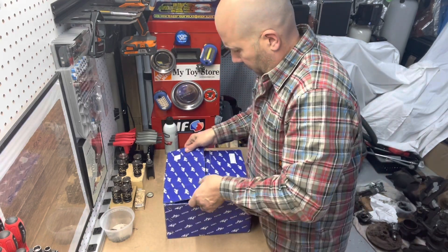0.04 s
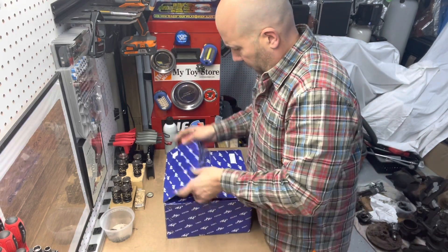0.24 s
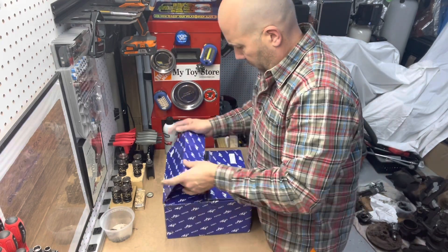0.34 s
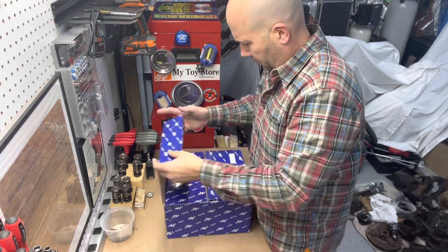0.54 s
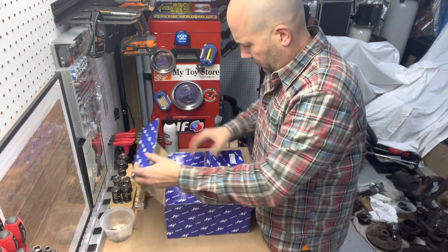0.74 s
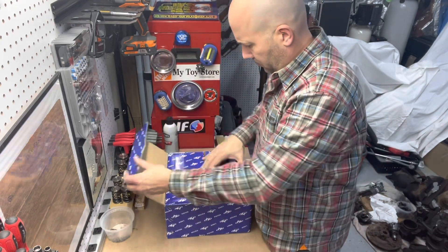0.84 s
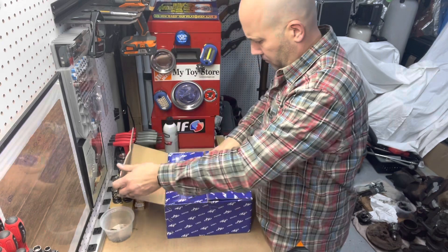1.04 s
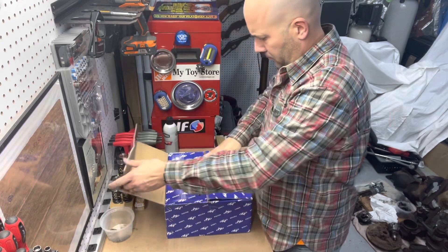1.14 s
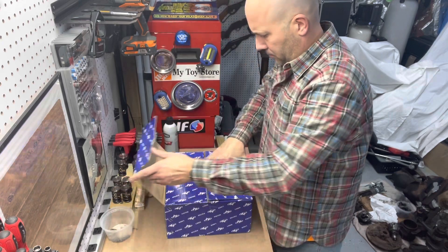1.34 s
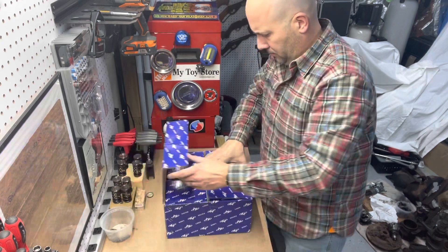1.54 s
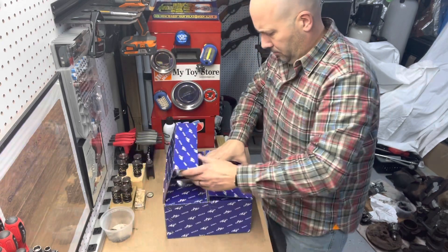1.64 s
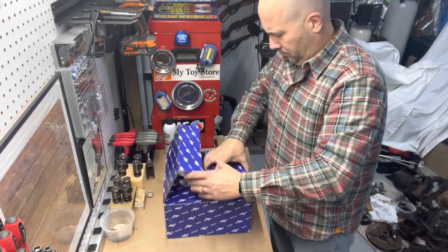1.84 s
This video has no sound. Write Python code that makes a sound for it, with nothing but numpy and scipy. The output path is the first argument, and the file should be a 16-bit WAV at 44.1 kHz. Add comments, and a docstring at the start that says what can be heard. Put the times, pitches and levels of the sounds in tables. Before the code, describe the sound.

Hands pull a cardboard box flap free with a hollow pop, then quietly fold flaps back

```python
"""Opening a cardboard box in a garage

Hands open the box on a bench: a flap rubs, pulls free with a cluster of hollow knocks, then flaps are folded
back with soft bumps, paper snaps and rubbing strokes. Knocks are sums of decaying box modes; snaps and rubbing
are shaped noise. The knocks and snaps excite a short room decay; a low rumble and a faint hiss lie beneath.
Two small microphone ports hear the treble with a phase twist."""
import sys
import numpy as np
from scipy import signal
from scipy.fft import rfft, irfft, next_fast_len
from scipy.io import wavfile
from scipy.ndimage import uniform_filter1d

SR = 44100
rng = np.random.default_rng(int(sys.argv[2]) if len(sys.argv) > 2 else 0)


def wav_out(sig):
    """Save sig, one row per channel (or a flat mono array), as 16-bit PCM at SR to the path in sys.argv[1]."""
    wavfile.write(sys.argv[1], SR, np.round(np.clip(np.atleast_2d(sig).T, -1, 1) * 32767).astype(np.int16))


N = 83790  # samples

# bumps of hand and flap on the box: start_s, level_db, pitch_hz (modes here are struck most),
# contact_s (time constant of the swell), ring_factor (times the mode's t60: below 1 shorter, above 1 longer)
BUMPS = [(.111, -35, 626, .004, 0.96), (.117, -31.5, 229, 0.0036, 0.8), (.180, -21, 660, 0.0032, 0.57),
         (0.191, -15.5, 346, 0.0037, 0.43), (.206, -38, 398, 0.0045, 0.71), (.213, -17, 1700, 0.0051, 1),
         (.220, -11, 770, 0.0034, 0.71), (0.2254, -2.5, 333, 0.0083, 0.64), (.235, -5.5, 829, 0.003, 1.31),
         (.236, -19, 2510, 0.0036, 0.53), (.239, -7, 990, .003, 0.91), (.240, -11, 315, 0.0055, 0.57),
         (.241, -8.5, 2020, 0.0014, 0.53), (.247, -5.5, 266, 0.0036, .6), (.251, -6, 460, 0.009, 0.88),
         (0.257, -18, 90, 0.0027, 1.82), (.262, -18.5, 740, 0.0059, .8), (.263, -32, 1250, 0.011, 1.2),
         (0.273, -23, 258, 0.0018, 1.39), (.283, -27.5, 405, 0.002, 0.67), (0.296, -28, 230, 0.0065, .8),
         (0.374, -32, 220, 0.0086, 1.07), (.385, -38, 784, 0.0042, 1), (.433, -36.5, 740, .002, 0.76),
         (.823, -47, 620, .003, 0.52), (.828, -38, 1540, 0.0027, 0.36), (0.841, -24.5, 123, 0.0023, 0.53),
         (.872, -26, 91, 0.0028, 0.66), (.935, -25, 123.9, 0.0046, 0.54), (.962, -40.5, 860, 0.0043, 0.53),
         (.984, -27, 675, 0.0023, 0.61), (1.05, -36, 680, .006, 1.37), (1.059, -31, 106.7, 0.0039, .5),
         (1.064, -36.5, 920, .005, 0.79), (1.155, -42.5, 890, .006, 0.77), (1.338, -47, 600, 0.0037, 1),
         (1.352, -43, 79, .01, .5), (1.636, -36, 252, .004, 0.7), (1.688, -38, 1140, 0.0027, 0.46),
         (1.704, -30, 1330, 0.0034, 0.55), (1.762, -28.5, 127, 0.002, 0.47),
         (1.804, -29.5, 495, 0.011, 0.81), (1.847, -32, 314, 0.007, 0.95), (1.861, -44, 130, 0.0044, .5),
         (1.865, -22.5, 1350, 0.0018, 0.57)]
# resonant modes of the box: mode_hz, level_db, t60_s (at ring_factor 1)
BOX_MODES = [(95, 0.5, 0.077), (138, -8.5, 0.42), (230, 1.5, 0.12), (273.8, 7.5, 0.066), (339.6, 4, 0.074),
             (432.4, 3, 0.071), (690, 3, 0.056), (766, 1, 0.051), (865, -2, 0.062), (1012.3, 0.5, 0.041),
             (1166.4, -1.5, 0.067), (1436, -6, 0.02), (1660, -6, 0.061), (1923, -9, 0.13),
             (2445, -13.5, 0.024), (2972, -14, 0.049)]
REACH_OCT, SCATTER_DB = 0.19, 2.5  # spread of excitation about the pitch; random level spread per mode
SPREAD_RAD = 0.55  # random phase spread of the upper modes, opposite in the two channels
WIDE_HZ = 350  # modes and room sound alike on both sides well below this

# paper snaps: start_s, crackle_db, crackle_t60_s, click_db (relative to the crackle)
PAPER_SNAPS = [(0.1148, -39.5, 0.09, -5), (0.185, -40, 0.16, -4), (0.2054, -29, 0.15, -21),
               (0.2337, -20.5, 0.048, -2), (0.4339, -42, 0.044, 18.5), (0.562, -51, .03, 7),
               (0.574, -50, 0.023, 7), (0.9842, -41, 0.067, 4), (1.1548, -59, 0.069, -3),
               (1.3374, -48.5, 0.04, 4), (1.4363, -54, 0.044, 1), (1.482, -54, 0.04, 7),
               (1.6841, -61, 0.024, -1), (1.8442, -55, 0.045, -2)]
# spectrum of the snaps: frequency_hz, relative_level_db
SNAP_SPECTRUM = [(800, -4.5), (2500, -4.5), (6000, 2), (10000, 1.5), (13000, -4.5), (16000, -12)]
CLICK_T60_S = 0.0036

# strokes of card on card: start_s, turn_s, end_s, turn_db (level at the turn),
# start_drop_db, end_drop_db (relative to the turn level, negative = louder there),
# body_db, fizz_db, sheen_db (band levels relative to the hiss)
STROKES = [(0, -0.007, 0.048, -55, -16, 11, 5, 2.5, -4), (0.051, 0.082, .1, -60.5, 6, -4.5, 3.5, -1, -13),
           (0.105, 0.11, 0.19, -53, 16, 6, 5, 4.5, -5), (0.167, 0.193, 0.22, -41, 8.5, -6, -1, -5.5, -5),
           (0.2313, .24, 0.34, -30.5, -7, 30.5, 11.5, -26, -29),
           (0.335, 0.384, 0.465, -54, 9.5, 3, 4.5, 4.5, -4),
           (0.473, 0.516, 0.56, -56.5, -3, 1.5, 1, 5.5, -16), (0.427, 0.428, 0.49, -53.5, -5, 18, -5, 1, 1),
           (.58, 0.686, .8, -71, 7.5, 11, 7, 12.5, 7), (0.784, .9, 1.014, -67, 0.5, -7.5, 1.5, 2, -3),
           (0.819, 0.829, 0.88, -57, -3, 19, 11.5, -19, -16),
           (0.98, 0.98, 0.98, -52.5, 6, 18, 9.5, 10.5, -9),
           (1.007, 1.056, 1.07, -56.5, 15.5, 0.5, 5, 6.5, -11),
           (1.156, 1.17, 1.147, -57.5, 11, 0.5, 6, 8, -9), (1.195, 1.297, 1.33, -67.5, 10, 4.5, 11.5, 1, 0),
           (1.324, 1.346, 1.372, -49, 9, 12, -1, -11, -18),
           (1.474, 1.498, 1.59, -55, 7.5, 5.5, 3.5, -15, -22),
           (1.535, 1.61, 1.704, -48.5, 10, 13.5, 6.5, -24, -30),
           (1.681, 1.712, 1.718, -54, 1.5, -3.5, 7, -25, -19.5),
           (1.768, 1.81, 1.92, -58.5, 8, -0.5, 7, -33, -26),
           (1.84, 1.867, 1.953, -47, 0.5, 17, -2.5, -3, -25)]
# spectra of the four rubbing bands, low to high: frequency_hz, relative_level_db
BODY_SPECTRUM = [(150, -64), (350, 2.5), (900, -1), (1600, 3), (2600, -2), (5000, -4)]
HISS_SPECTRUM = [(900, -46), (2000, -4.5), (3200, -3), (5000, -5.5), (7000, -10), (10000, -32)]
FIZZ_SPECTRUM = [(3000, -20), (5500, -3), (8000, 0), (10500, 0), (12000, -3), (15000, -16)]
SHEEN_SPECTRUM = [(9000, -20), (12000, -3), (13500, 0), (15500, -1), (15900, -6), (16200, -30)]
FADE_IN_S, RELEASE_DB_PER_S = 0.0083, 506  # onset of a stroke; extra fall after its end
SLIPS_PER_S, SLIP_DB, SLIP_S = 900, 1.5, 0.003  # fibre slips: mean rate, size spread, energy decay constant
MODE_COLOUR = 6  # weight of the box modes in the lower rubbing bands, against 1 for the direct sound

# decay of the room: frequency_hz, t60_s
ROOM_DECAY = [(100, 0.23), (500, 0.15), (2000, 0.37), (10000, 0.22)]
ROOM_DB, ROOM_DELAY = -12.5, 200  # level; delay in samples

# spectrum of the low rumble: frequency_hz, relative_level_db (per Hz)
RUMBLE_SPECTRUM = [(15, -59), (25, -31), (59, 0), (135, -4.5), (253, -16), (293, -8.5), (380, -28.5),
                   (579, -22.5), (628, -22), (1200, -47), (1560, -79), (2640, -120)]
# spectrum of the faint hiss: frequency_hz, relative_level_db
AIR_SPECTRUM = [(300, -7), (600, -10), (1000, -5), (2500, -8.5), (6000, -12.5), (10000, -18.5),
                (15600, -35.5), (16200, -51)]
RUMBLE_DB, AIR_DB = -42.5, -61  # rms levels

# left-right likeness of the noises: frequency_hz, correlation (0 to 1)
LIKENESS = [(60, .985), (200, .93), (600, .6), (2500, .4), (6800, .45), (7800, .93), (10000, .96),
            (16000, .98)]
# phase by which the right port leads the left: frequency_hz, lead_rad
PORT_PHASE = [(0, 0), (4500, -2.5), (6000, -4.6), (8100, -3.14), (10400, 0), (12800, 3.14), (15300, 6.28),
              (17000, 8)]
TOP_HZ = 16700  # band limit


def amp(db):
    """Decibel law: level in dB to amplitude ratio."""
    return 10 ** (np.asarray(db) / 20)


def unit(x):
    """Normalisation of the mean power: x scaled to rms 1."""
    return x / np.sqrt(np.mean(x ** 2) + 1e-20)


def along(points, hz):
    """Interpolation on a logarithmic frequency axis."""
    f, v = np.transpose(points)
    return np.interp(np.log(hz + 1), np.log(f + 1), v)


def filtered(x, response):
    """Linear filtering: the spectrum of x times a response of frequency."""
    size = next_fast_len(N + SR // 2)
    spectrum = rfft(x, size) * response(np.fft.rfftfreq(size, 1 / SR))
    return irfft(spectrum, size)[..., :N]


def rush(spectrum, patchy_db):
    """Random noise of rms 1: gain varies in time-frequency patches, mid-side balance sets the correlation."""
    noise = signal.stft(rng.standard_normal((2, N)), nperseg=512)[2]
    patches = uniform_filter1d(rng.standard_normal(noise.shape[1:]), size=5, axis=0)
    patches = uniform_filter1d(patches, size=6, axis=1)
    pair = signal.istft(noise * amp(patchy_db * unit(patches)), nperseg=512)[1][:, :N]

    def mid_side_response(hz):
        # the cosine of twice this angle is the left-right correlation
        angle = np.arccos(np.clip(along(LIKENESS, hz), -1, 1)) / 2
        return amp(along(spectrum, hz)) * [np.cos(angle), np.sin(angle)]

    mid, side = filtered(pair, mid_side_response)
    return unit(np.array([mid + side, mid - side]))


def knocks():
    """Modal excitation: a bump rings the box modes near its pitch; a longer contact swells more slowly."""
    out = np.zeros((2, N + SR))
    t = np.arange(SR // 4) / SR
    hz, mode_db, t60 = np.transpose(BOX_MODES)[..., None]
    widening = hz ** 2 / (hz ** 2 + WIDE_HZ ** 2)
    for start, db, pitch_hz, contact, ring_factor in BUMPS:
        level_luck, phase_luck = rng.standard_normal((2, len(BOX_MODES), 1))
        decay_db = -60 * t / (ring_factor * t60)
        nearness = np.exp(-0.5 * (np.log2(hz / pitch_hz) / REACH_OCT) ** 2)
        gain = nearness * amp(db + mode_db + SCATTER_DB * level_luck + decay_db)
        phase = SPREAD_RAD * phase_luck * widening
        left = (gain * np.sin(2 * np.pi * hz * t - phase)).sum(axis=0)
        right = (gain * np.sin(2 * np.pi * hz * t + phase)).sum(axis=0)
        swell = 1 - np.exp(-t / contact)
        out[:, round(start * SR):][:, :len(t)] += np.array([left, right]) * swell
    return out[:, :N]


def snaps():
    """Impulsive noise: a click and a bright crackle start together, each decaying exponentially."""
    envelope = np.zeros(N + SR)
    t = np.arange(SR // 8) / SR
    for start, db, crackle_t60, click_db in PAPER_SNAPS:
        crackle = amp(db - 60 * t / crackle_t60)
        click = amp(db + click_db - 60 * t / CLICK_T60_S)
        envelope[round(start * SR):][:len(t)] += crackle + click
    return envelope[:N] * rush(SNAP_SPECTRUM, patchy_db=-0.5)


def slip_roughness():
    """Stick-slip friction: random fibre slips add bursts of energy, which roughen the amplitude."""
    happens = rng.random(N) < SLIPS_PER_S / SR
    slips = happens * amp(SLIP_DB * rng.exponential(size=N))
    decay = np.exp(-np.arange(600) / (SLIP_S * SR))
    energy = np.convolve(slips ** 2, decay)[:N]
    return unit(np.sqrt(0.5 + energy))  # 0.5 keeps some sound between slips


def box_response(f):
    """Resonance: direct sound plus peaks at the box modes, narrower for a longer decay."""
    peaks = sum(amp(2 * db) / (1 + ((f - hz) * t60 / 2) ** 4) for hz, db, t60 in BOX_MODES)
    return 1 + MODE_COLOUR * np.sqrt(peaks)


def rubbing():
    """Friction noise: four bands share the slip roughness; the lower two sound through the box modes."""
    t = np.arange(N) / SR
    envelopes = np.zeros((4, N))
    for start, turn, end, turn_db, start_drop, end_drop, body_db, fizz_db, sheen_db in STROKES:
        fade_in = np.clip((t - start) / FADE_IN_S, 0, 1)
        release = amp(-RELEASE_DB_PER_S * np.maximum(t - end, 0))
        course_db = turn_db - np.interp(t, [start, turn, end], [start_drop, 0, end_drop])
        band_db = np.array([[body_db], [0], [fizz_db], [sheen_db]])
        envelopes += fade_in * release * amp(course_db + band_db)
    roughness = slip_roughness()
    body = unit(filtered(rush(BODY_SPECTRUM, patchy_db=0.5), box_response))
    hiss = unit(filtered(rush(HISS_SPECTRUM, patchy_db=0.5), box_response))
    fizz = rush(FIZZ_SPECTRUM, patchy_db=2)
    sheen = rush(SHEEN_SPECTRUM, patchy_db=5)
    bands = sum(envelope * band for envelope, band in zip(envelopes, (body, hiss, fizz, sheen)))
    return roughness * bands


def garage(x):
    """Reverberation: a noise tail decays at its own speed at each frequency; its bass is near mono."""
    hz, t, noise = signal.stft(rng.standard_normal((2, SR // 2)), SR, nperseg=256)
    widening = (hz ** 2 / (hz ** 2 + WIDE_HZ ** 2))[:, None]
    side = noise[1] * widening
    pair = np.array([noise[0] + side, noise[0] - side])
    decay = amp(-60 * t / along(ROOM_DECAY, hz)[:, None])
    tail = signal.istft(pair * decay, SR, nperseg=256)[1]
    tail = tail / np.linalg.norm(tail[0])
    delayed = np.pad(x, (ROOM_DELAY, 0))
    return signal.fftconvolve(delayed[None], tail, axes=1)[:, :N]


def rumble():
    """Low-frequency background: stationary noise with its power concentrated in the bass."""
    return amp(RUMBLE_DB) * rush(RUMBLE_SPECTRUM, patchy_db=0)


def air():
    """Broadband background: faint hiss with slight random patches."""
    return amp(AIR_DB) * rush(AIR_SPECTRUM, patchy_db=1.5)


def scene():
    """Superposition: box sounds, the room's answer to the left box channel, rubbing and the background."""
    box = knocks() + snaps()
    background = rumble() + air()
    room = amp(ROOM_DB) * garage(box[0])
    return box + room + rubbing() + background


def record(dry):
    """Interchannel phase: the two ports twist against each other; nothing is kept above the band limit."""
    def port_response(hz):
        lead = np.interp(hz, *np.transpose(PORT_PHASE))
        return (hz < TOP_HZ) * np.exp(0.5j * np.outer([-1, 1], lead))  # half the lead on each side

    return filtered(dry, port_response)


dry = scene()
out = record(dry)
wav_out(out)
```